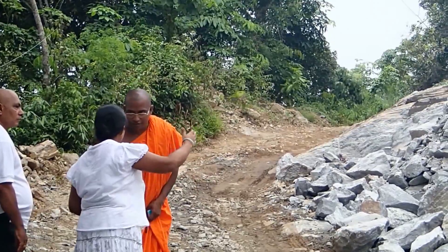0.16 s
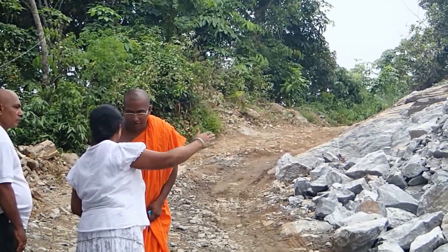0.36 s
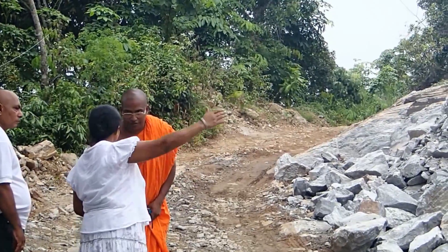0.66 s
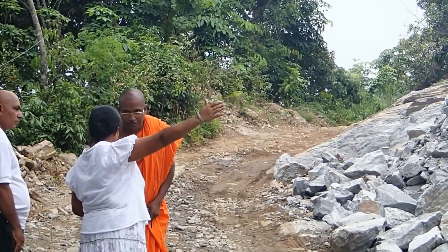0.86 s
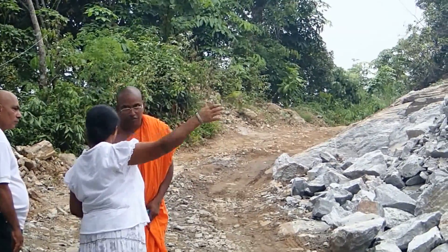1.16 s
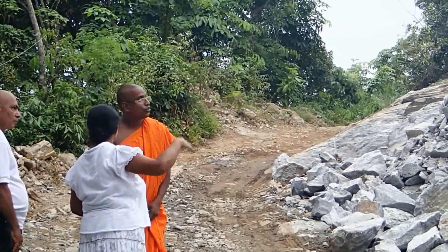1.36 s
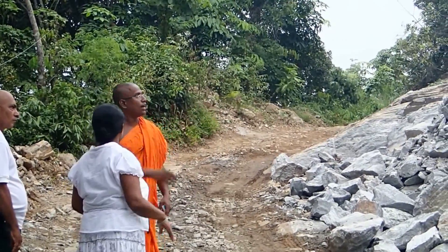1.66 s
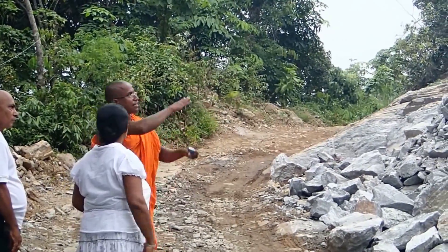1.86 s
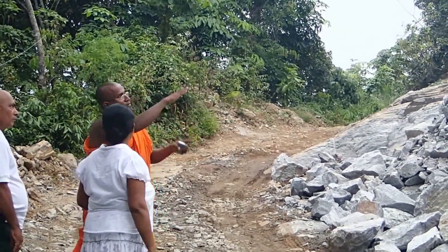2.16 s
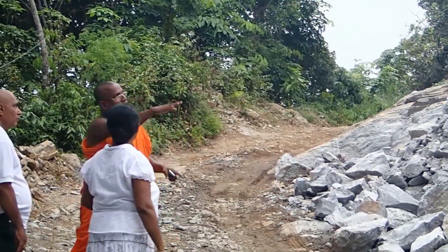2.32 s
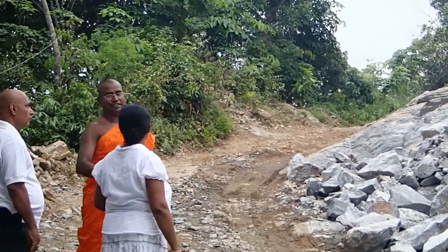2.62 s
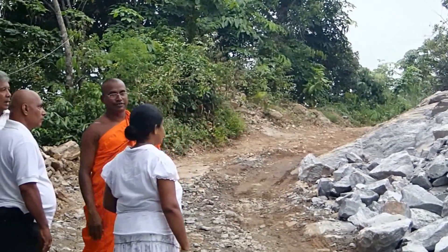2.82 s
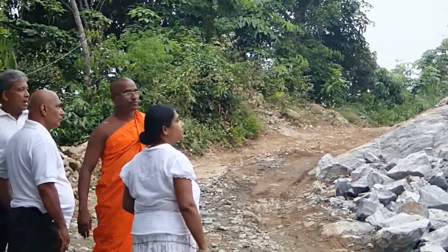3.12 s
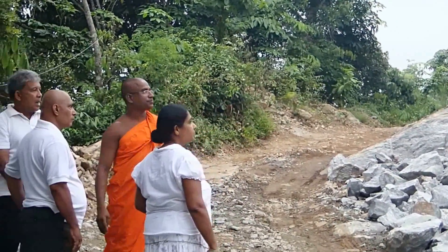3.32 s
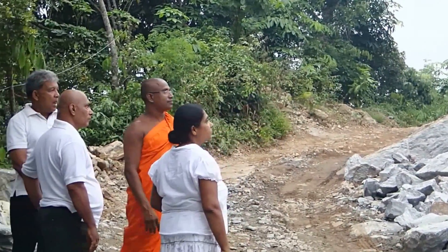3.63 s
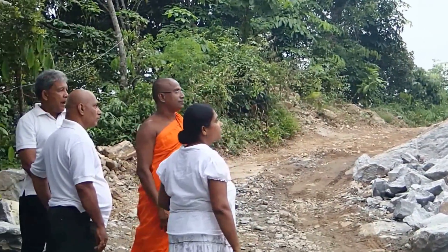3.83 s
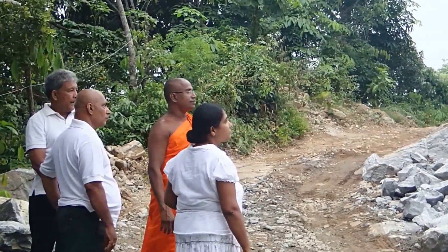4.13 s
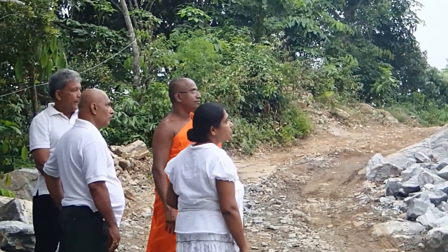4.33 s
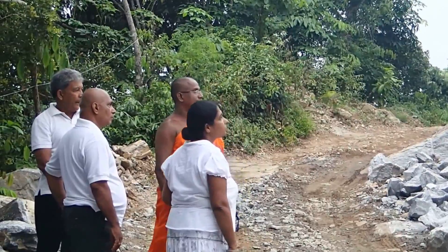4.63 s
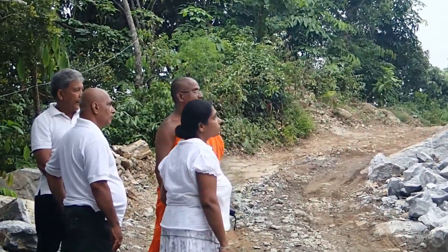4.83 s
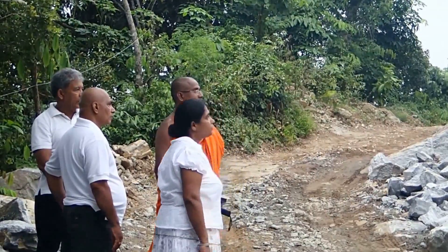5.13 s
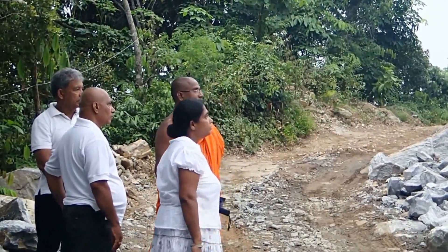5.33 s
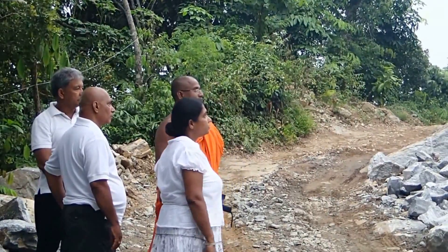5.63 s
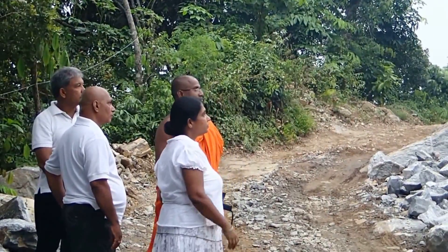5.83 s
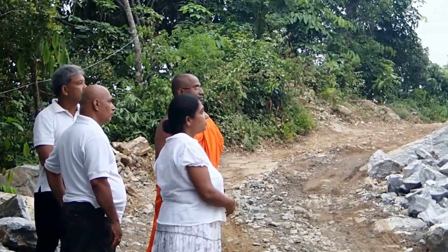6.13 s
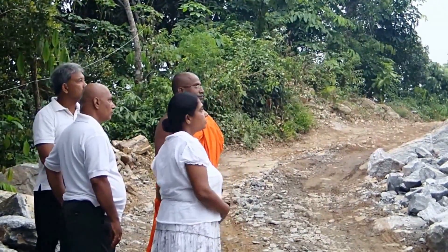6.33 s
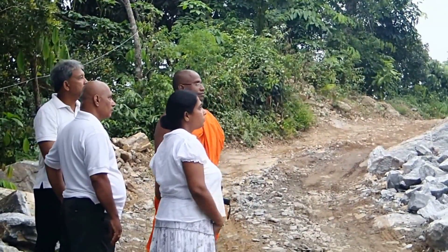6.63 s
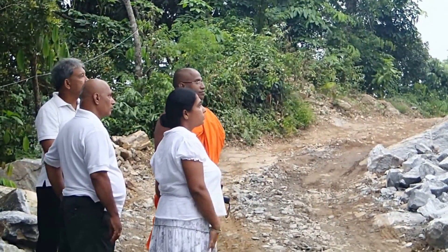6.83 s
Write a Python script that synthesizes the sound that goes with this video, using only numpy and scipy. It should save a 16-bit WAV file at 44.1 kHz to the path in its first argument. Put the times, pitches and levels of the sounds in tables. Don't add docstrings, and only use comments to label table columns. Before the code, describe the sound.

A rock drill hammers granite about ten times a second, hard ringing metallic blows with short washes of echo over a faint steady engine drone.

```python
import sys
import numpy as np
from scipy import signal
from scipy.fft import rfft, irfft, next_fast_len
from scipy.io import wavfile

SR = 44100
rng = np.random.default_rng(int(sys.argv[2]) if len(sys.argv) > 2 else 0)


def ratio_of_db(decibels):
    return 10 ** (np.asarray(decibels, float) / 20)


def generate_wav(signal):
    frames = np.transpose(np.atleast_2d(signal))
    scaled = np.clip(frames, -1, 1) * 32767
    pcm = np.round(scaled).astype(np.int16)
    wavfile.write(sys.argv[1], SR, pcm)


N = 307377

FREE_HZ = [
    840,
    1125,
    2345,
    7838,
]
# loudness at the left port in dB, time to die by 60 dB in seconds.
FREE_MODES = [
    (-40.5, .2),
    (-43, .14),
    (-36, .07),
    (-41.5, .09),
]
LOW_HZ = [701, 989, 1672, 1805, 2742, 2843, 3140, 3565, 3939, 4877, 4912, 5064, 5212, 5438]
HIGH_HZ = [6165, 6313, 7390, 9260, 10590, 10930, 12300, 12600, 13100, 13980, 14180, 15300]
# loudness at the left port in dB, time to die in seconds.
OTHER_MODES = [(-51, .3), (-57, .25), (-38, .1), (-47, .1), (-35.5, .1), (-43, .2), (-43, .1), (-34, .055),
               (-43, .14), (-39, .15), (-39, .12), (-46, .08), (-32, .1), (-34, .07), (-39, .07),
               (-35, .12), (-54, .1), (-61, .05), (-64, .07), (-63, .06), (-92, .1), (-84, .08), (-81, .05),
               (-79, .08), (-75, .07), (-92, .12)]
FOLLOWERS = {3565: (2, .5), 2742: (3, .4), 1672: (3, .25), 1805: (2, -.6), 5212: (3, .2), 5438: (3, .2)}
REBOUND = {5212: (.014, 7), 5438: (.016, 9), 7838: (.021, 11)}

# pitch in Hz, crack in dB, time for the crack to die in seconds,
# echoes in dB, time for the echoes to die in seconds, steady engine and air noise in dB.
WASH = [(60, -8, .06, -20, .3, -4), (160, -6, 0.02, -3, 0.11, -2), (340, 5.5, 0.069, -4, 0.72, -2.5),
        (685, 26, 0.0033, 1, 0.57, 1.5), (1910, 16, 0.035, 7, 0.27, -4), (3300, 11, 0.041, 3, 0.3, -0.5),
        (5100, 6.5, 0.21, -0.5, 0.57, 2.5), (7100, -2.5, 0.0069, 0.5, 0.083, -7),
        (11030, 17, 0.035, -1, 0.79, -2.5), (15000, -20, 0.039, -23, 0.29, -16)]
# pitch in Hz, loudness in dB.
ENGINE = [
    (51, -75),
    (90, -62.5),
    (179, -54.5),
]

# pitch in Hz, gain in dB.
LEFT_PORT = [(35, -27), (60, -13), (110, -2), (300, -5), (800, -4), (2000, -1), (3600, 2.5), (4050, -13.5),
             (4900, -0.5), (6100, 1), (7100, -8.5), (9000, -27.5), (11800, -38), (15500, -36)]
# pitch in Hz, gain in dB, phase lead in radians, likeness from 0 to 1.
RIGHT_PORT = [(100, -4.6, 0, 1), (1000, -6, 0, 1), (2500, -10, 0.02, .99), (3500, -12, 1.7, .93),
              (4300, -2, 2.4, .9), (4800, 5, 2.1, .95), (5450, -3, 1.0, .93), (6300, -6, 2.3, .9),
              (7200, 0, 3.14, .9), (8500, 10, 3.14, .5), (10500, 15, 3.1, .5), (12000, 23, 2.5, .15),
              (13200, 19, .3, .1), (13700, 8, .3, .1), (15200, -5, 0, .1)]

# times in seconds, then blow numbers.
MARK_S = [.069, .745, 1.4173, 1.517, 1.6214, 1.721, 2.591, 3.176, 3.284, 3.3921, 3.784, 4.466, 5.628, 6.111,
          6.88]
MARK_BLOW = [0, 7, 14, 15, 16, 17, 26, 32, 33, 34, 38, 45, 57, 62, 70]
# time in seconds, force in dB, seating in the rock in dB,
# down pressure from 0 to 1, slack of the collar in dB.
HANDLING = [(0, -10, 2, 0, -39), (.9, -11, -2.5, 0.15, -15), (1.25, -13, -2, 0.2, -3),
            (1.6, -9.5, 2.5, 0.23, 7), (2.0, -10, 0.5, 0.14, 4.5), (2.65, -9.5, -1.5, 0.15, 9),
            (3.2, -7.5, 2, 0.17, 9), (3.45, -6.5, 3, 0.75, -17), (3.85, -8, 0, 1, -10),
            (4.2, -7.5, 1.5, 0.37, -14), (4.7, -9.5, 1.5, 0.1, -1), (5.0, -9, 0.5, 0.16, 7),
            (5.5, -9, -0.5, 0.32, 9), (5.8, -9, -3.5, 0.64, 10.5), (6.35, -9.5, -2.5, 0.42, 10),
            (6.5, -11.5, -3, 0.1, -17.5), (6.62, -7.5, -1.5, 0.66, 14), (6.97, -9.5, -1.5, 0, -8)]

EARLIER_BLOW_S = .028
BEAT_JITTER_S, FORCE_SCATTER_DB = .0004, .8
CHANCE = rng.standard_normal((MARK_BLOW[-1] + 1, 2))
BLOW_S = np.interp(np.arange(len(CHANCE)), MARK_BLOW, MARK_S) + BEAT_JITTER_S * CHANCE[:, 0]


def at_hz(rows, hz, order=1):
    rows = np.array(rows)
    return np.interp(np.log(np.maximum(hz, 1)), np.log(rows[:, 0]), rows[:, order])


def handling(order):
    rows = np.array(HANDLING)
    return np.interp(BLOW_S, rows[:, 0], rows[:, order])


def blow_db(hz):
    force_db = handling(order=1) + FORCE_SCATTER_DB * CHANCE[:, 1]
    thud_db = -24.5 + handling(order=2) - force_db
    ring_db = -16 - 8 * handling(order=3) - force_db
    thud_share = np.interp(hz, [1200, 2200], [1, 0])
    ring_share = np.interp(hz, [3930, 4730, 8700, 12900], [0.0091, 0.77, 0.67, 1.0])
    return force_db + 10.0 + thud_share * (thud_db + 14.5) + ring_share * (ring_db + 12.5)


def freedom_db():
    pressure = handling(order=3)
    lowest = -4 + .4 * handling(order=2)
    second = np.interp(pressure, [0, 1], [-1.5, 16])
    knock = np.interp(pressure, [0, 1], [-7.5, 2.5])
    return [lowest, second, knock, handling(order=4)]


def clicks(sizes, late_s=0.):
    train = np.full(N, 1e-18)
    at = np.round((BLOW_S + late_s) * SR).astype(int)
    inside = at < N
    train[at[inside]] = sizes[inside]
    return train


def dying(train, t60, rise_s):
    left_over = train.max() * ratio_of_db(-60 * EARLIER_BLOW_S / t60 - 2)
    fall = signal.lfilter([1], [1, -ratio_of_db(-60 / (t60 * SR))], train, zi=[left_over])[0]
    rise = np.exp(-1 / (rise_s * SR))
    return signal.lfilter([1 - rise], [1, -rise], fall)


def flicker(rate):
    knots = rng.standard_normal(int(N / SR * rate) + 2)
    return np.interp(np.arange(N) / SR * rate, np.arange(len(knots)), knots)


def repeated_noise(count, lasting, early_keep, late_keep):
    at = np.round(np.append(-EARLIER_BLOW_S, BLOW_S) * SR).astype(int)
    blow = np.searchsorted(at, np.arange(N), side="right") - 1
    age = np.arange(N) - at[blow]
    longest = SR // 8
    keep = np.clip(np.interp(np.arange(longest) / SR, [.008, .05], [early_keep, late_keep]), 0, 1)
    rows = rng.standard_normal((len(at) + 1, count, longest))
    for k in range(2, len(rows)):
        rows[k] = keep * rows[k - 1] + np.sqrt(1 - keep ** 2) * rows[k]
    share = np.clip(lasting, 0, 1) * keep ** 2
    patterns = np.sqrt(share) * rows[0] + np.sqrt(1 - share) * rows[1:]
    return patterns[blow, :, age].T


def ring(train, hz, t60):
    r, w = ratio_of_db(-60 / (t60 * SR)), 2 * np.pi * hz / SR
    return signal.lfilter([0, np.sin(w)], [1, -2 * r * np.cos(w), r * r], train)


def drill_steel(scatter_db, rattle_s, strike_db):
    out = np.zeros(N)
    pitches, modes = FREE_HZ + LOW_HZ + HIGH_HZ, FREE_MODES + OTHER_MODES
    extra_db = freedom_db() + [0] * len(OTHER_MODES)
    rattle = repeated_noise(count=1, lasting=.7, early_keep=.85, late_keep=.75)[0]
    for hz, (level_db, t60), more_db in zip(pitches, modes, extra_db):
        if hz in FOLLOWERS:
            leader, share = FOLLOWERS[hz]
            more_db = share * extra_db[leader]
        size = ratio_of_db(blow_db(hz) + more_db + scatter_db * rng.standard_normal(len(BLOW_S)))
        hum = hz < 900
        feed = dying(clicks(size), 1.2 if hum else rattle_s, rise_s=.0015)
        if hz in REBOUND:
            delay_s, again_db = REBOUND[hz]
            feed = feed + ratio_of_db(again_db) * dying(clicks(size, delay_s), t60=.07, rise_s=.0025)
        burst = feed * (rattle[::-1] if hum else rattle)
        late_s = .0007 + .0022 * rng.random()
        struck = 900 < hz < 7000
        strike = ratio_of_db(strike_db) * clicks(size, late_s) * struck
        mode = ring(strike + burst, hz, t60)
        out += ratio_of_db(level_db - at_hz(LEFT_PORT, hz)) * mode / np.std(mode)
    return out


def first_push(push_db, low_hz, high_hz):
    shape = signal.butter(2, [low_hz, high_hz], "band", fs=SR, output="sos")
    return signal.sosfilt(shape, clicks(ratio_of_db(blow_db(1650) + push_db), late_s=0.000896))


def wash(scatter_db, patchy_db):
    out, edges = 0, 28 * 2 ** np.arange(0, 9.4, 1 / 3)
    fresh = rng.standard_normal((2, 2, N))
    again = repeated_noise(count=4, lasting=.3, early_keep=.82, late_keep=.65).reshape(2, 2, N)
    for k, (low, high) in enumerate(zip(edges, edges[1:])):
        hz = np.sqrt(low * high)
        size = ratio_of_db(blow_db(hz) + scatter_db * rng.standard_normal(len(BLOW_S)))
        train = clicks(size)
        if hz < 300:
            train = train + clicks(size * ratio_of_db(-5), late_s=.028)
        crack = ratio_of_db(at_hz(WASH, hz)) * dying(train, at_hz(WASH, hz, order=2), rise_s=0.00022)
        echoes = ratio_of_db(at_hz(WASH, hz, order=3)) * dying(clicks(size), at_hz(WASH, hz, order=4), rise_s=0.001)
        steady = ratio_of_db(at_hz(WASH, hz, order=5) + patchy_db * flicker(60.))
        drive = np.hypot(crack, echoes) * again[k % 2] + steady * fresh[k % 2]
        band = signal.butter(2, [low, high], "band", fs=SR, output="sos")
        left, other = signal.sosfilt(band, drive)
        alike = np.clip(at_hz(RIGHT_PORT, hz, order=3), 0, 1)
        right = alike * left + np.sqrt(1 - alike ** 2) * other
        out = out + np.array([left, right])
    return ratio_of_db(-21) * out


def engine(wobble_hz):
    turns = np.cumsum(1 + wobble_hz / 100 * flicker(1.38)) / SR
    out = np.zeros(N)
    for hz, db in ENGINE:
        loudness = ratio_of_db(db + 5.5 - at_hz(LEFT_PORT, hz) + flicker(3.3))
        out += loudness * np.sin(2 * np.pi * hz * turns)
    return out


def scene():
    direct = drill_steel(scatter_db=2.0, rattle_s=.2, strike_db=26)
    direct = direct + first_push(push_db=8, low_hz=89.4, high_hz=2280)
    direct = direct + engine(wobble_hz=.3)
    return direct + wash(scatter_db=0.2, patchy_db=2.0)


def roll_off(x):
    return signal.sosfilt(signal.butter(12, 15720, fs=SR, output="sos"), x)


def record(dry):
    size = next_fast_len(N + SR // 2)
    hz = np.arange(size // 2 + 1) * SR / size
    cepstrum = irfft(np.log(ratio_of_db(at_hz(LEFT_PORT, hz))), size)
    cepstrum[1:size // 2] *= 2
    cepstrum[size // 2 + 1:] = 0
    left, right = rfft(dry, size) * np.exp(rfft(cepstrum))
    right = right * ratio_of_db(at_hz(RIGHT_PORT, hz)) * np.exp(1j * at_hz(RIGHT_PORT, hz, order=2))
    ports = irfft([left, right], size)[:, :N]
    return roll_off(ports)


dry = scene()
out = record(dry)
generate_wav(out)
```